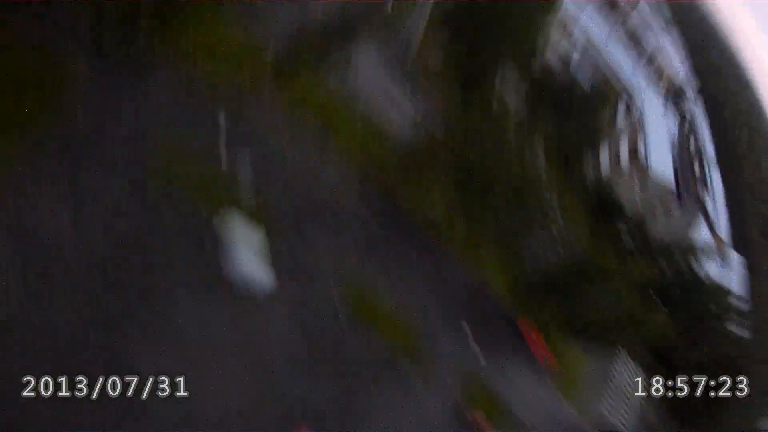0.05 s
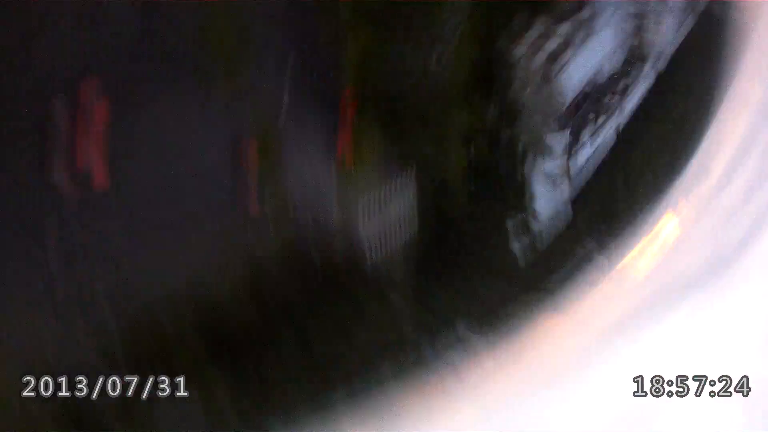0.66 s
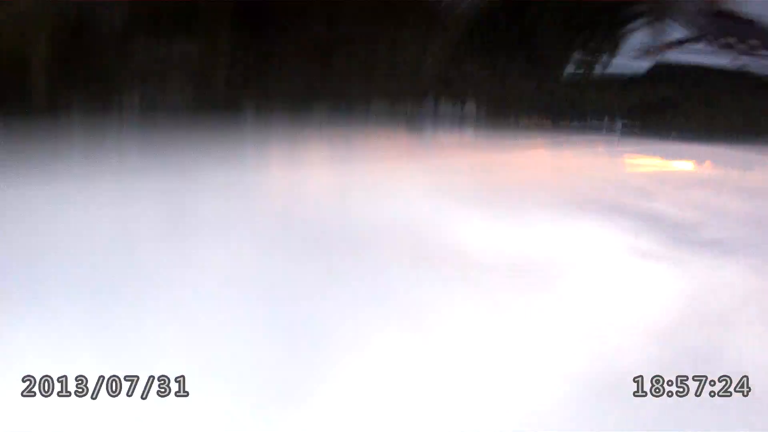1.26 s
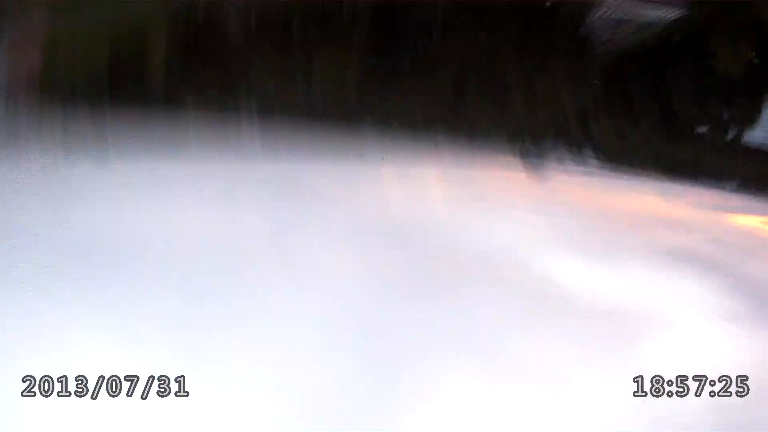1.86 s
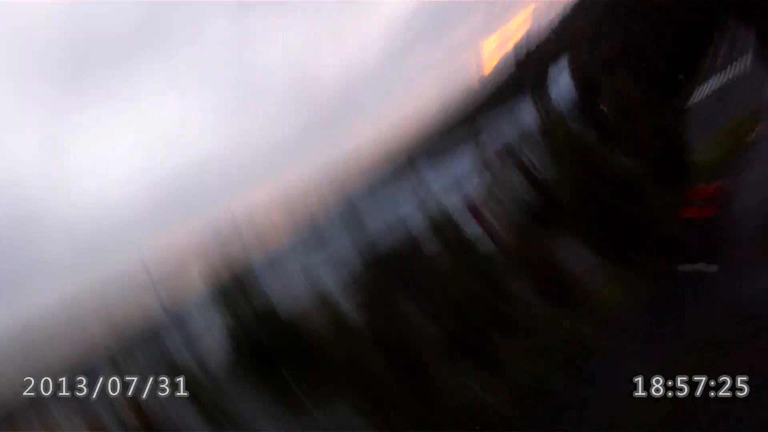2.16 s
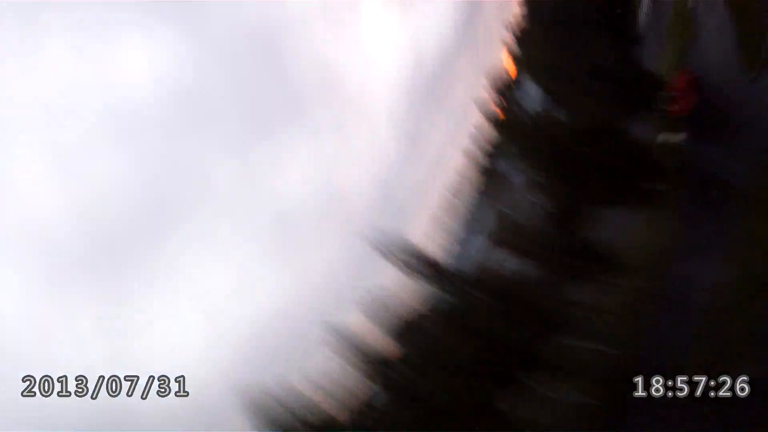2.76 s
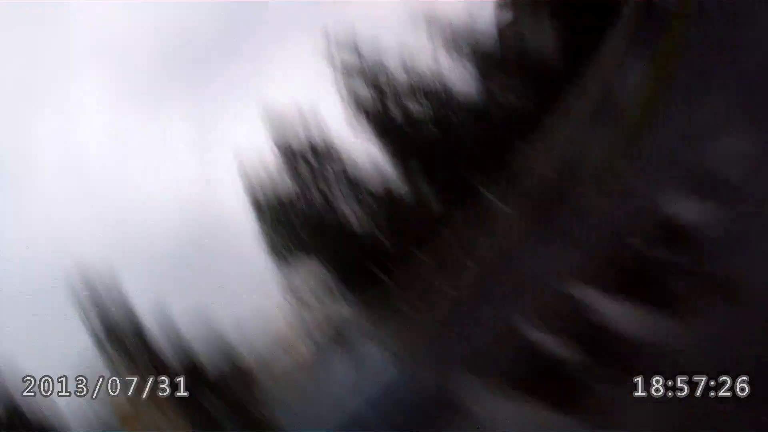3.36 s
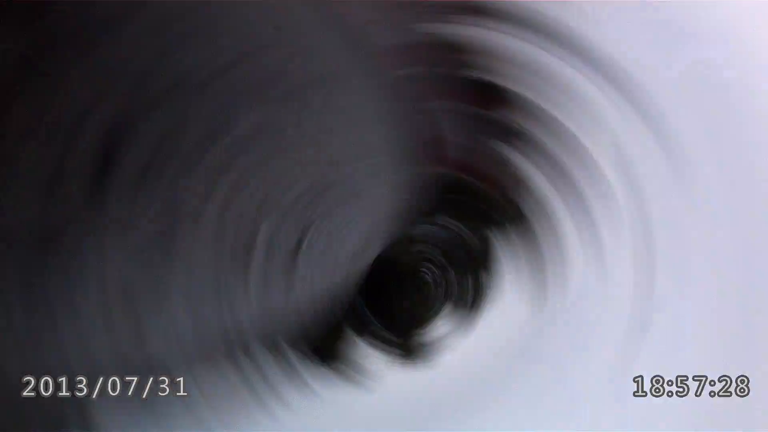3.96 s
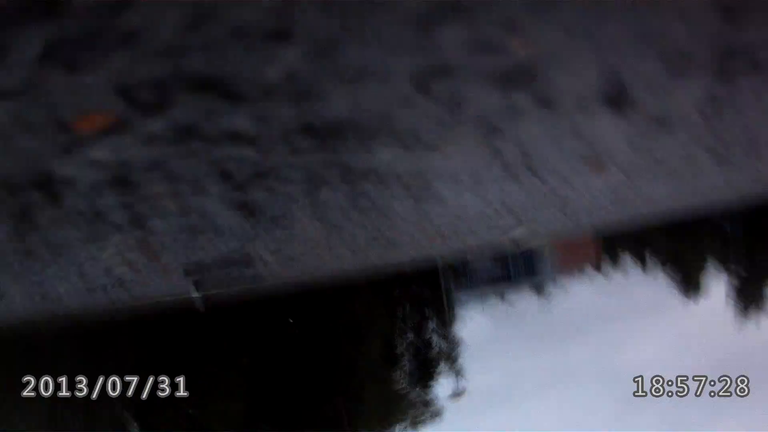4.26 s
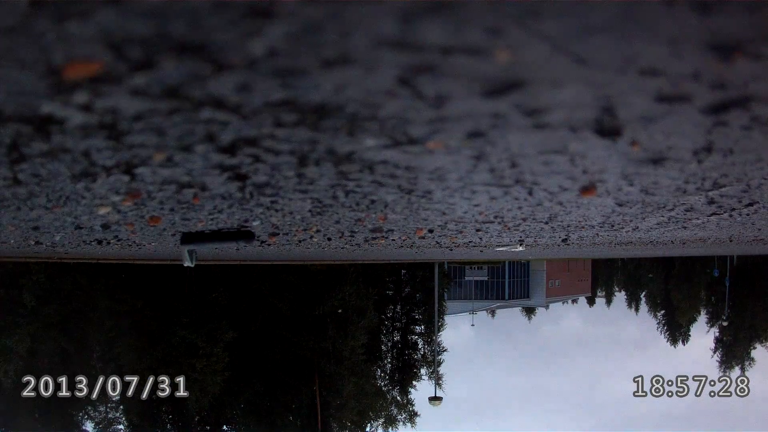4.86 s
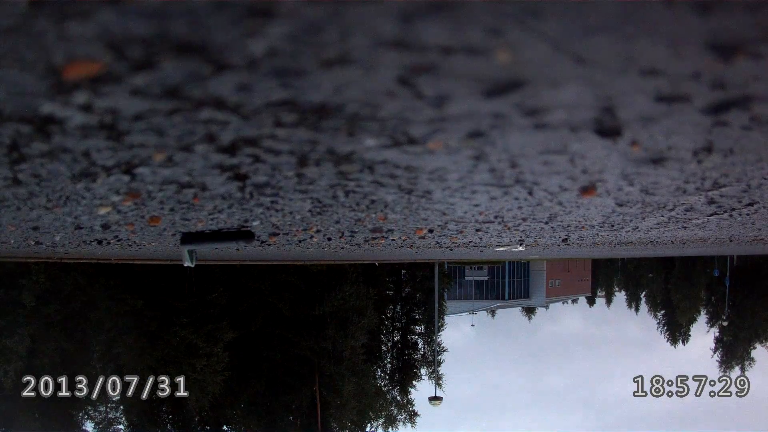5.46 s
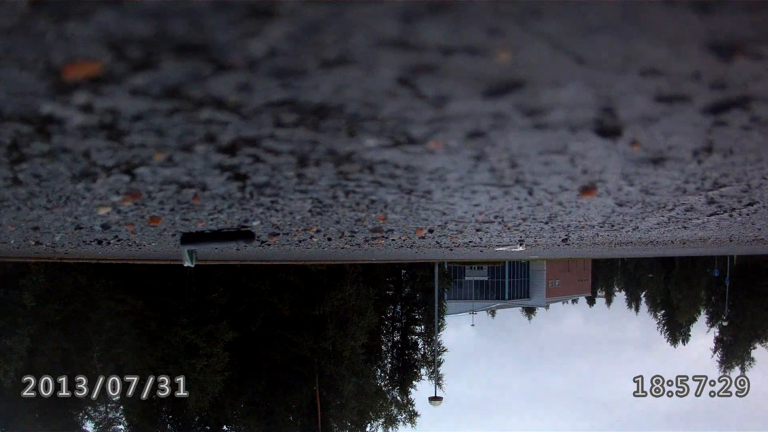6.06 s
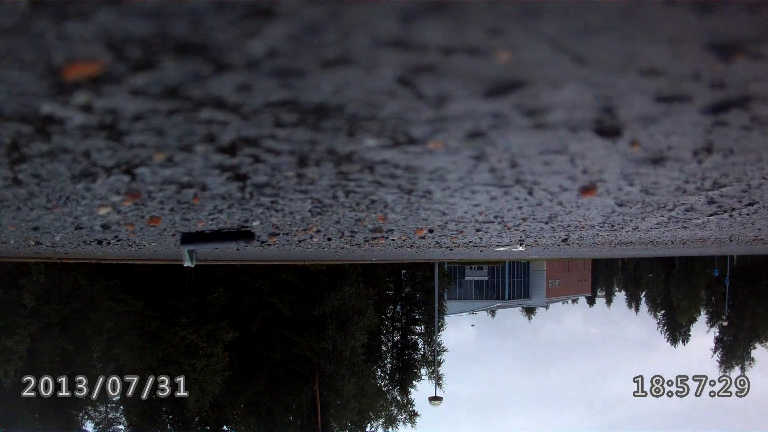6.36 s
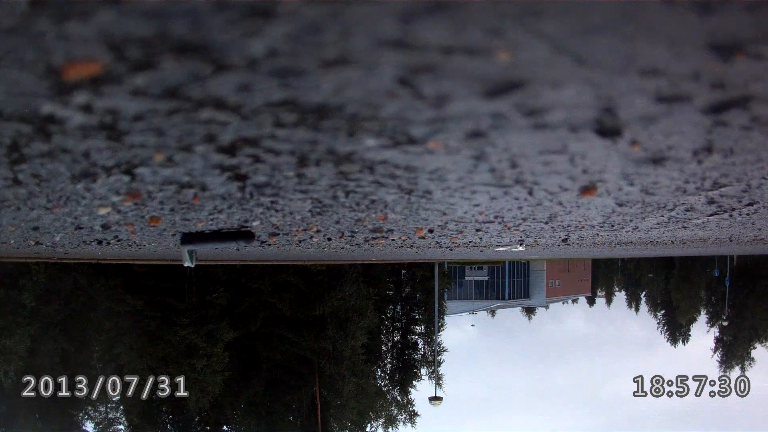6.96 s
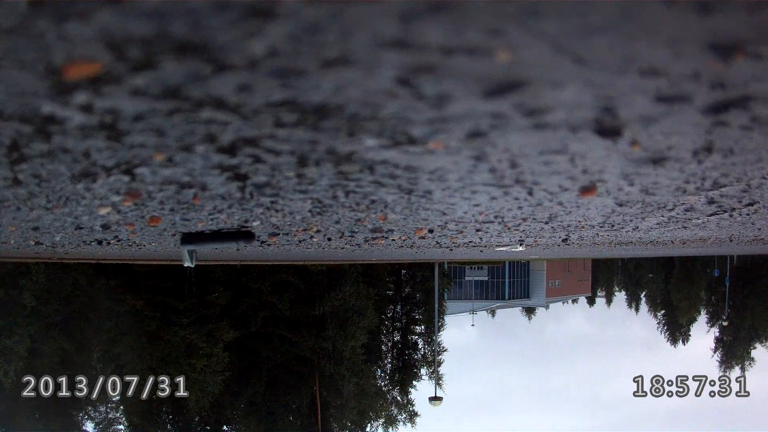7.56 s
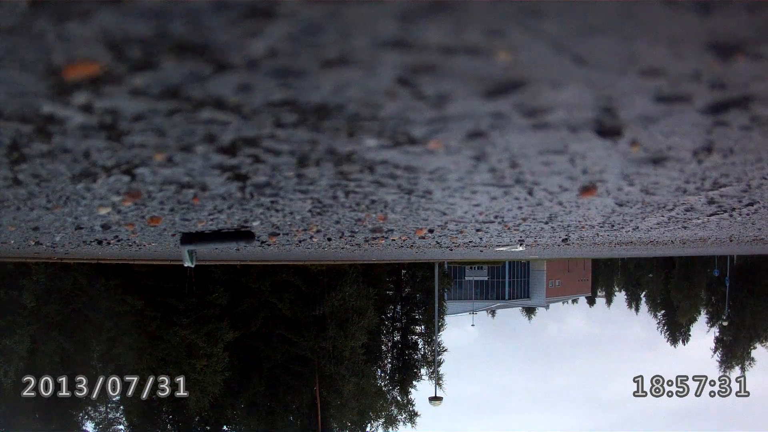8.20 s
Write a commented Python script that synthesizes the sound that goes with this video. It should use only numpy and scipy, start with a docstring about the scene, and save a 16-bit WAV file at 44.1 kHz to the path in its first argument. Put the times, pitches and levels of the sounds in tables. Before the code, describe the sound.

Wind buffets over surging, rattling drone motors until sharp knocks and scrapes on pavement cut them off, leaving quiet and a few ticks.

```python
"""Wind buffets the microphone over humming, whining rotors: a small quadcopter is tumbling out of
the sky, heard from its own camera. The rotors shake the frame into a rattle, and on each tumble the
airstream overloads the microphone. At about 3.5 s the propellers hit asphalt; the frame bounces,
scrapes and comes to rest. A few ticks follow in the quiet open air."""
import sys
import numpy as np
from scipy import signal
from scipy.fft import rfft, irfft
from scipy.io import wavfile
from scipy.ndimage import uniform_filter1d

SR = 44100
rng = np.random.default_rng(int(sys.argv[2]) if len(sys.argv) > 2 else 0)


def master(y):
    """Save y as 16-bit WAV."""
    cut = np.clip(np.atleast_2d(y).T, -1, 1)
    pcm = np.round(cut * 32767)  # scale
    wavfile.write(sys.argv[1], SR, pcm.astype(np.int16))


N = 362943
TIME = np.arange(N) / SR

# The unbalanced rotor surges once a tumble.
# Each row: start in seconds, length in seconds, top speed in turns per second.
ROTOR_SURGES = [(.02, 0.53, 117), (.7, .33, 110), (1.28, 0.34, 140.5), (1.86, .5, 130.5), (2.46, .55, 146),
                (3.06, .5, 152)]
# So does the fastest motor. Each row: start in seconds, length in seconds, top of its whine in Hz.
WHINE_SURGES = [(.05, 0.48, 1928), (.59, 0.45, 1955), (1.05, .55, 1981), (1.63, 0.54, 2050),
                (2.26, .72, 2050), (3.0, 0.61, 1920)]
# How hard the frame shakes. Each row: time in seconds, relative level in dB.
FRAME_SHAKE = [(0.07, -31), (0.15, -28.5), (0.57, -35), (0.87, -31), (1.02, -37), (1.03, -28.5),
               (1.31, -31), (1.36, -44.5), (1.58, -31), (1.63, -39), (1.7, -33.5), (1.92, -35),
               (1.94, -37.5), (2.42, -32.5), (2.6, -36), (2.94, -31), (3.35, -34.5), (3.5, -35)]
# The other motors whistle.
# Each row: start in seconds, length in seconds, first pitch in Hz, last pitch in Hz, level in dB.
WHISTLES = [(0.49, 0.11, 5120, 4700, -31), (0.484, 0.19, 5200, 2700, -36.5), (1.4, 0.2, 3950, 4400, -32),
            (1.6, 0.15, 3730, 4220, -34)]
# The microphone swings into the airstream. Each row: start in seconds, hold in seconds, level in dB.
TUMBLE_GUSTS = [(0, .14, -8.5), (0.268, 0.057, -21), (0.491, 0.082, -21.5), (0.662, 0.04, -8.5),
                (0.872, 0.076, -11.5), (1.337, .19, -7), (1.802, 0.05, -17.5), (1.939, 0.2, -1.5),
                (2.535, .26, -1), (3.134, 0.24, 2), (3.515, .03, -12.5)]
# Wind in the lee of the case, growing as the fall speeds up. Each row: time in seconds, level in dB.
LEE_WIND = [(0, -21), (.8, -39.5), (1.7, -32), (2.17, -17.5), (2.35, -25), (2.85, -18.5), (3.53, -20)]
# Sudden shoves of air. Each row: time in seconds, level in dB.
AIR_BUFFETS = [(1.877, -9.5), (2.446, -7), (3.078, -10.5)]
# The main blows on the frame. Each row: time in seconds, force in dB, favoured pitch in Hz,
# loss away from that pitch in dB per octave, relative crack level in dB.
BLOWS = [(3.5802, -31.5, 1007, 4.5, -38.5), (3.6021, -28, 1390, 1, -25.5), (3.6775, -0.5, 1000, 5.5, -20),
         (3.713, -3, 1771, 12, -18), (3.7161, 3, 2048, 8.5, -19), (3.7344, -19.5, 1495, -1, -21.5),
         (3.7904, 11, 836, 9.5, -9.5), (3.8645, 1, 3000, 6, -32.5), (3.8873, -23.5, 1500, -4, -28.5),
         (3.9032, -7, 788.5, 4, -37), (3.952, -16, 900, 0.5, -49), (3.9686, 11, 724.4, 13, -15.5),
         (3.9997, -11, 4500, 12.5, -33), (4.0145, -6.5, 1600, 7, -43), (4.0381, -2.5, 1920, 15.5, -20),
         (4.0515, -19.5, 2500, 0, -8), (4.0864, -20.5, 900, 3.5, -44), (4.1745, -24, 1100, -1, -48),
         (4.203, 3.5, 1000, 10.5, -49), (4.2437, -1, 720, 8.5, -53), (4.2731, -10, 2010, 0, -54),
         (4.3261, -10.5, 2070, 8.5, -28), (4.368, -17, 2200, 5.5, -29.5), (4.8202, -10, 3540, 11.5, -33)]
# Modes of the frame and camera case. Each row: pitch in Hz, gain in dB, t60 in seconds.
FRAME_MODES = [(309.3, 8.5, 0.0099), (707, 2.5, 0.012), (1115, 6.5, 0.0067), (1450, 4, 0.0093),
               (1690, 7, 0.0093), (2387, 11.5, 0.0032), (2935, 8, 0.0054), (3678, 2, 0.0043),
               (5180, 0, .007), (6430, -11, 0.0031), (11100, -5, .003), (12800, 7.5, 0.005)]
# Blades and arms dig into the asphalt. Each row: start in seconds, length in seconds, level in dB.
DIGS = [(3.529, 0.033, -0.5), (3.61, 0.022, -10), (3.632, 0.035, -22), (3.682, 0.087, -39),
        (3.772, 0.028, -21.5), (3.888, 0.025, -20.5), (3.934, .024, -27), (4.021, 0.15, -30),
        (4.25, 0.05, -28.5), (4.427, 0.053, -38.5)]
# Motor bells and arms left ringing. Each row: time in seconds, pitch in Hz, level in dB, t60 in seconds.
BELL_PINGS = [(3.612, 13750, -27.5, 0.36), (4.0145, 3583, -30, .3)]
# Ticks of the wreck at rest.
# Each row: time in seconds, level in dB, treble against mids in dB, rattling time in seconds.
WRECK_TICKS = [(4.7466, -46, -4, 0), (5.08, -48.5, 6, 0), (5.1128, -52, 12.5, 0), (5.2537, -39.5, 2.5, 0),
               (5.3552, -49.5, 3, 0), (5.5288, -42.5, -5, 0), (6.5234, -34, -12, 0),
               (6.537, -29, 11.5, .085), (6.9711, -43.5, -8, 0), (7.0433, -28.5, -6, 0),
               (7.0732, -34, 14, 0), (7.1641, -37, -8, 0), (7.21, -37.5, -7, .13)]
# Modes of the arms and motor bells. Each row: pitch in Hz, gain in dB, t60 in seconds.
ARM_MODES = [(960, -34, 0.18), (1900, -13, 0.027), (2575, -13, 0.027), (3276, -7, 0.023),
             (4132, -11, 0.017), (4866, -9, 0.031), (6380, -12, .025), (11320, -20, 0.019),
             (12900, -22, .02), (13970, -19.5, .018)]
# Tone colours of the noise layers. Each row: frequency in Hz, relative level in dB.
RATTLE_EQ = [(40, -13), (120, -4), (300, -6), (600, -11.5), (1000, -3.5), (1900, 1), (2900, -1.5),
             (3700, -6.5), (4700, -4), (6500, -18), (9000, -16.5), (11500, -13.5), (15000, -12)]   # loose frame
WIND_EQ = [(25, -18), (60, -30), (130, -10.5), (260, -0.5), (450, 1), (700, -0.5), (1100, -5.5),
           (2000, -16), (4000, -29.5), (9000, -49.5)]   # eddies on the microphone
CRACK_EQ = [(100, -30.5), (900, -20), (2500, 7), (5000, 0.5), (7000, -7), (9000, -5), (12000, -6),
            (15500, -2)]   # crushed grit
SCRAPE_EQ = [(60, -18), (300, -10.5), (800, 3.5), (1600, 6), (2500, 4), (3600, 1.5), (5000, -0.5),
             (7000, -11), (9000, -9.5), (12000, -8), (15500, -2.5)]   # plastic on stone
AIR_EQ = [(18, -53.5), (30, -23), (227, -16), (666, -6.5), (1100, -2.5), (2120, -12), (3220, -18.5),
          (3670, -16.5), (4780, -24.5), (7470, -31), (8740, -45.5), (14800, -19), (16000, -28.5)]   # open air

ROTOR_IDLE_HZ, HUM_DB = 92.9, -34.5   # turns per second and level between surges
WHINE_IDLE_HZ, WHINE_DB, MAGNETS = 1737, -31.5, 14
IMPACT_S, SLIDE_START_S, SLOWING_S, REST_S = 3.545, 3.56, 4.351, 4.77


def rotors(shake_db, wind_db, flutter=.0025, waver_db=3, full_braking_hz_per_s=170):
    """Shaft hum, blade tones and the whine of magnets passing coils, with rattle and blade slap."""
    speed = motor_speed(ROTOR_SURGES, ROTOR_IDLE_HZ, roundness=1.2)
    braking = np.clip(-np.gradient(speed) * SR / full_braking_hz_per_s, 0, 1)
    braking = uniform_filter1d(braking, size=2000)
    hum_db = HUM_DB + 12 * np.log2(speed / ROTOR_IDLE_HZ)
    blade_db = HUM_DB + 1.4 * TIME + 9 * braking   # grows through the fall, flares on braking
    turns = np.cumsum(speed * (1 + flutter * drift(40))) / SR
    whine_hz = motor_speed(WHINE_SURGES, WHINE_IDLE_HZ, roundness=.8) * (1 + flutter * drift(60))
    poles = np.cumsum(whine_hz) / SR
    partials = [(turns, hum_db), (2 * turns, blade_db - 8), (3 * turns, blade_db - 8.5),
                (poles, WHINE_DB), (2 * poles, WHINE_DB - 15)]
    tones = sum(np.sqrt(2) * from_db(db + waver_db * drift(25)) * np.sin(2 * np.pi * cycles)
                for cycles, db in partials)
    return tones + rattle(turns, poles / MAGNETS, shake_db) + blade_slap(turns, wind_db)


def motor_speed(surges, idle_hz, roundness):
    """Each surge lifts a motor from idle to top speed and back in one arch."""
    lift_hz = 0
    for start, length, top_hz in surges:
        progress = np.clip((TIME - start) / length, 0, 1)
        lift_hz += (top_hz - idle_hz) * np.abs(np.sin(np.pi * progress)) ** roundness
    return idle_hz + lift_hz


def rattle(turns, fast_turns, shake_db, uneven_db=4.5, wash=.26):
    """Once a turn, each rotor throws the loose frame against its mount: chatter over the blade wash."""
    hits = once_a_turn(turns) + from_db(-8.5) * once_a_turn(fast_turns)
    hits *= from_db(uneven_db * np.clip(noise(), -2, 1))
    bursts = uniform_filter1d(fade(hits, t60=.012), size=48)   # a millisecond of attack
    return from_db(shake_db + 13) * colour((bursts + wash) * noise(), RATTLE_EQ)


def blade_slap(turns, wind_db, uneven_db=5.5):
    """Once a turn a blade's wake puffs against the case, harder in a strong airstream."""
    puffs = once_a_turn(turns) * from_db(uneven_db * noise())
    thuds = butterworth(ring(puffs, hz=380, t60=.0036), 900, "low")
    return from_db(-12 + .65 * wind_db) * rms_one(thuds)


def whistles(flutter=.002):
    """Motors speed up and brake: each whistle swells and fades as its pitch slides."""
    out, wobble = np.zeros(N), 1 + flutter * drift(60)
    for start, length, first_hz, last_hz, db in WHISTLES:
        during = (TIME >= start) & (TIME < start + length)
        hz = np.linspace(first_hz, last_hz, during.sum()) * wobble[during]
        swell = from_db(db) * np.sin(np.linspace(0, np.pi, len(hz)))
        out[during] += np.sqrt(2) * swell * np.sin(2 * np.pi * np.cumsum(hz) / SR)
    return out


def screech(at_s=.043):
    """One brief bright rasp, as of a blade grazing the frame."""
    rasp = rms_one(ring(noise(), hz=5700, t60=.00097))
    return fade(clicks_at(at_s, from_db(-6.5)), t60=.074) * rasp


def wind(level_db, lumps_db=2.5, howl_db=-8.5):
    """Eddies break on the microphone port in lumps and buffets; fast air makes the port howl."""
    times, buffet_db = np.transpose(AIR_BUFFETS)
    buffets = fade(clicks_at(times, from_db(buffet_db)), t60=.14)
    level = from_db(level_db + lumps_db * drift(60)) + buffets
    howl = from_db(howl_db) * level ** 1.4 * rms_one(ring(noise(), hz=720, t60=.0076))
    return level * colour(noise(), WIND_EQ) + howl


def airstream_db(rise_db_per_s=259.5, fall_db_per_s=279, dome_db=2):
    """Each gust swells, arches over and dies away above the wind in the lee."""
    level = from_db(in_time(LEE_WIND))
    for start, hold, db in TUMBLE_GUSTS:
        droop_db = dome_db * np.clip(2 * (TIME - start) / hold - 1, -1, 1) ** 2
        attack_db = rise_db_per_s * np.maximum(start - TIME, 0)
        release_db = fall_db_per_s * np.maximum(TIME - start - hold, 0)
        level = np.hypot(level, from_db(db - droop_db - np.minimum(attack_db + release_db, 100)))
    return 20 * np.log10(level)


def knocks(grit=.076, most_loss_db=28):
    """Each blow rings the damped frame; crushed grit adds roughness and a crack."""
    times, blow_db, pitch_hz, loss_db, crack_db = np.vstack([BLOWS, chatter()]).T

    def force_db(hz):
        """Blows drive the frame less away from their favoured pitch."""
        return blow_db - np.minimum(loss_db * np.abs(np.log2(hz / pitch_hz)), most_loss_db)

    cracks = fade(clicks_at(times, from_db(crack_db + 14.5)), t60=.006)
    out = cracks * colour(noise(), CRACK_EQ) + soft_lead_in(times, force_db(3000))
    for hz, db, t60 in FRAME_MODES:
        drive_db = crack_db if hz > 8000 else force_db(hz)   # the crack drives the top modes
        blows = clicks_at(times, from_db(drive_db + db) * contact(len(times), spread_db=-.5))
        crunch = grit * fade(blows, t60=.014) * noise()
        out += ring(blows + crunch, hz, t60)
    return out


def chatter(per_s=20, spread_db=-.5, spread_octaves=.6, loss_db_per_octave=4):
    """Light, uneven blows all through the slide, as rows like those of BLOWS."""
    timing, force, pitch, crack = rng.standard_normal((100, 4)).T
    times = SLIDE_START_S + np.abs(np.arange(100) + timing / np.pi) / per_s
    db = slowing_db(times) + spread_db * force
    hz = 2200 * 2 ** (spread_octaves * pitch)
    crack_db = db - 41.5 + spread_db * crack
    rows = np.transpose([times, db - 31.5, hz, np.full(100, loss_db_per_octave), crack_db])
    return rows[times < REST_S]


def soft_lead_in(times, clack_db, lead_s=.006):
    """A faint, short hiss starts just before each knock of the slide and softens its attack."""
    heights = (times < REST_S) * from_db(np.minimum(clack_db, -10) - 17)
    envelope = fade(clicks_at(times - lead_s, heights), t60=.04)
    return uniform_filter1d(envelope, size=200) * colour(noise(), SCRAPE_EQ)


def contact(count, spread_db):
    """The point of contact gives a mode its own strength and sign on each blow."""
    strength, side = rng.standard_normal((200, 2))[:count].T
    return from_db(spread_db * strength) * np.sign(side)


def slowing_db(times, db_per_s=72.5):
    """Contacts weaken steadily once the wreck starts to slow."""
    return -db_per_s * np.maximum(times - SLOWING_S, 0)


def scrapes(slide_db=-40, grain_db=5.5, catch_db=3):
    """Plastic drags over stones: a grainy hiss that catches and slips, louder where a blade digs in."""
    level = from_db(slide_db + slowing_db(TIME)) * (TIME > SLIDE_START_S) * (TIME < REST_S)
    for start, length, db in DIGS:
        level += from_db(db) * (TIME >= start) * (TIME < start + length)
    grains = noise() * from_db(grain_db * drift(600) + catch_db * drift(130))
    return uniform_filter1d(level, size=100) * colour(grains, SCRAPE_EQ)


def pings():
    """A motor bell or an arm is struck and rings on."""
    return sum(ring(clicks_at(at_s, from_db(db)), hz, t60) for at_s, hz, db, t60 in BELL_PINGS)


def ticks():
    """Small scratchy snaps ring the arms, with a faint scatter from the surroundings."""
    times, tick_db, treble_db = ticks_with_rebounds().T
    taps = clicks_at(times, from_db(tick_db))
    bright_taps = clicks_at(times, from_db(tick_db + treble_db - 4.5))
    snap = fade(bright_taps, t60=.013) * colour(noise(), CRACK_EQ)
    scatter = from_db(-20) * fade(taps, t60=.19) * colour(noise(), SCRAPE_EQ)
    scratch = from_db(-8) * fade(taps, t60=.023) * colour(noise(), RATTLE_EQ)
    out = snap + scatter + butterworth(scratch, 1800, "high")
    for hz, db, t60 in ARM_MODES:
        strikes = from_db(tick_db + db - 4.5) * contact(len(times), spread_db=3)
        out += ring(clicks_at(times, strikes), hz, t60)
    return out


def ticks_with_rebounds(gap_s=.026, unevenness=.14, drop_db=8.5, loss_db_per_s=37):
    """Each tick trails a dying run of rebounds for as long as it rattles."""
    rows = []
    for at_s, db, treble_db, length in WRECK_TICKS:
        rows.append((at_s, db, treble_db))
        delays = np.cumsum(gap_s * (1 + unevenness * rng.standard_normal(12)))
        for delay in delays[delays < length]:
            rows.append((at_s + delay, db - drop_db - loss_db_per_s * delay, min(treble_db, 0)))
    return np.array(rows)


def still_air(hiss_db=-64, thumps_per_s=5):
    """A quiet bed of hiss with faint, soft thumps at random moments."""
    taps = (rng.random(N) < thumps_per_s / SR) * from_db(-54 + 2 * noise())
    thumps = ring(uniform_filter1d(taps, size=32), hz=280, t60=.012)
    return from_db(hiss_db) * colour(noise(), AIR_EQ) + thumps


def port(x, dip_hz=9000, width_hz=3500):
    """The microphone's opening in the case notches out a band of treble."""
    return signal.lfilter(*signal.iirnotch(dip_hz, dip_hz / width_hz, fs=SR), x)


def from_db(db):
    """Decibels to gain."""
    return 10 ** (np.asarray(db) / 20)


def rms_one(x):
    """Scale to rms 1."""
    return x / np.sqrt(np.mean(x ** 2) + 1e-20)


def noise():
    """White noise for the whole scene."""
    return rng.standard_normal(N)


def drift(rate):
    """A smooth random wander of rms 1 that changes about rate times a second."""
    return rms_one(np.interp(TIME * rate, np.arange(N // 8), rng.standard_normal(N // 8)))


def in_time(rows):
    """An automation curve through (seconds, value) points."""
    return np.interp(TIME, *np.transpose(rows))


def clicks_at(times, heights):
    """Single-sample clicks at times in seconds."""
    out = np.zeros(N)
    out[np.round(np.asarray(times) * SR).astype(int)] = heights
    return out


def once_a_turn(turns):
    """A unit click at each completed turn."""
    return np.diff(np.floor(turns), prepend=0)


def fade(clicks, t60):
    """Each click becomes a dying envelope of its own height."""
    return signal.lfilter([1], [1, -from_db(-60 / (t60 * SR))], clicks + 1e-18)


def ring(x, hz, t60):
    """A resonator: a unit click rings as a dying cosine of height 1."""
    radius, angle = from_db(-60 / (t60 * SR)), 2 * np.pi * hz / SR
    return signal.lfilter([.5, 0, -.5], [1, -2 * radius * np.cos(angle), radius ** 2], x + 1e-18)


def butterworth(x, hz, kind, order=2):
    """A plain low-pass or high-pass."""
    return signal.sosfilt(signal.butter(order, hz, kind, fs=SR, output="sos"), x)


def colour(x, eq, size=4096):
    """Minimum-phase EQ, so nothing rings ahead of an attack; the result has rms 1."""
    hz, db = np.transpose(eq)
    bin_hz = np.arange(size // 2 + 1) * SR / size
    log_gain = np.log(from_db(np.interp(np.log(bin_hz + 1), np.log(hz), db)))
    cepstrum = irfft(log_gain)[:size // 2]
    cepstrum[1:] *= 2
    impulse = irfft(np.exp(rfft(cepstrum, size)))
    return rms_one(signal.fftconvolve(x, impulse)[:N])


def scene():
    """The flight cuts out on impact and the crash takes over, all on a bed of still air."""
    wind_db, shake_db = airstream_db(), in_time(FRAME_SHAKE)
    flying = np.clip((IMPACT_S - TIME) / .01, 0, 1)
    flight = flying * (wind(wind_db) + rotors(shake_db, wind_db) + whistles() + screech())
    crash = knocks() + scrapes() + pings() + ticks()
    return (port(flight + crash) + still_air())[None]


def record(dry, ceiling=.68, hardness=8.7, bass_cut_hz=70, treble_cut_hz=15700):
    """The small camera thins the deep bass, overloads into flat tops and cuts the high treble."""
    low_pass = signal.firwin(161, treble_cut_hz, window=("kaiser", 9), fs=SR)[None]
    thin = butterworth(dry, bass_cut_hz, "high", order=1)
    heard = signal.fftconvolve(thin, low_pass, "same")
    clipped = heard / (1 + np.abs(heard / ceiling) ** hardness) ** (1 / hardness)
    return signal.fftconvolve(clipped, low_pass, "same")


dry = scene()
out = record(dry)
master(out)
```